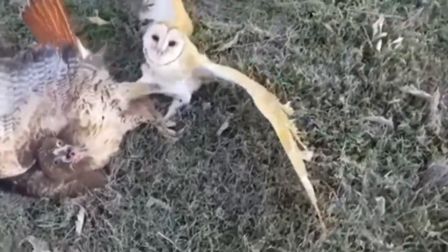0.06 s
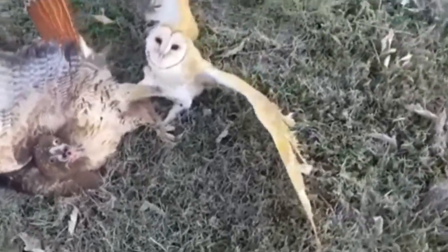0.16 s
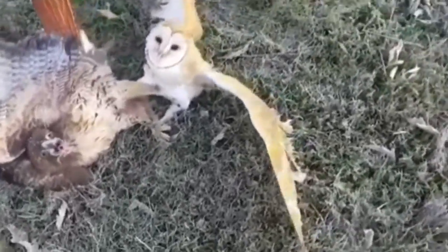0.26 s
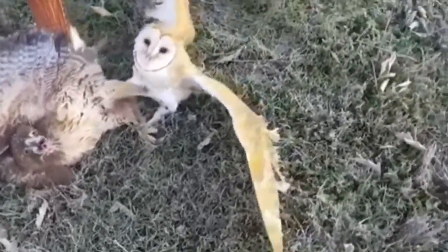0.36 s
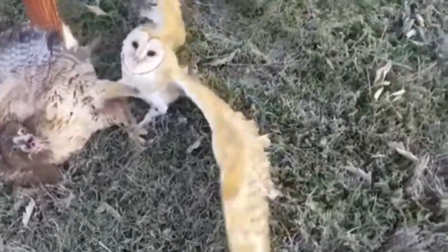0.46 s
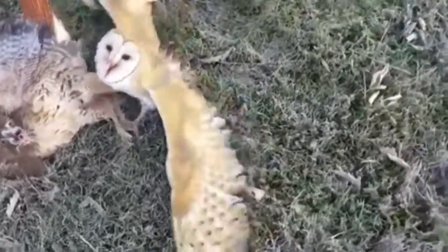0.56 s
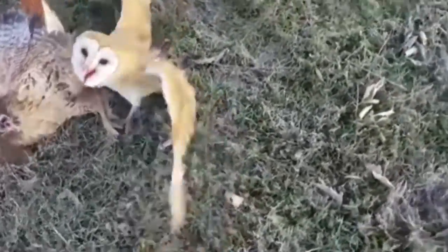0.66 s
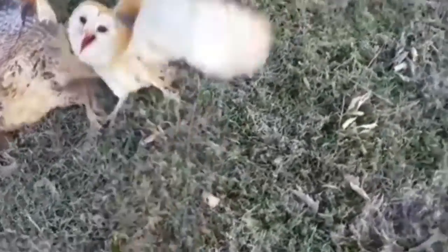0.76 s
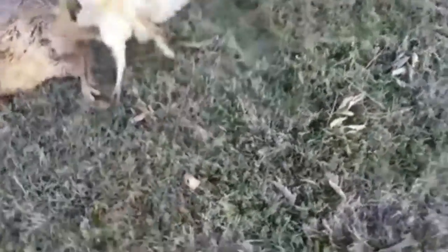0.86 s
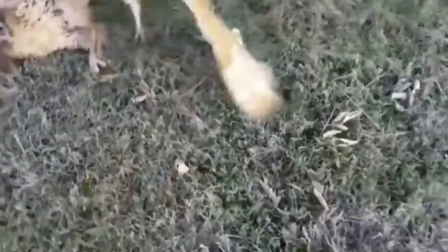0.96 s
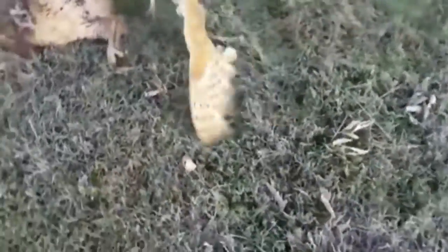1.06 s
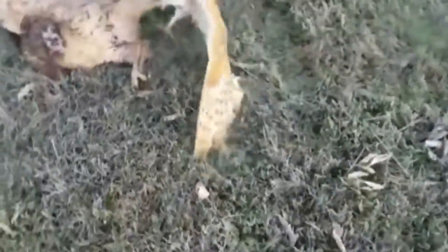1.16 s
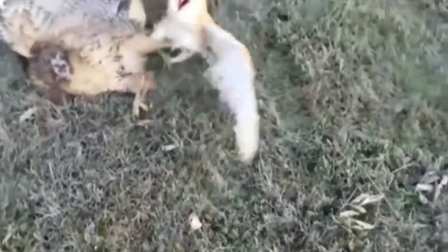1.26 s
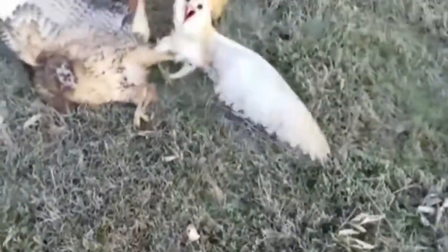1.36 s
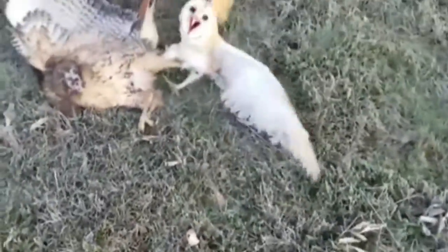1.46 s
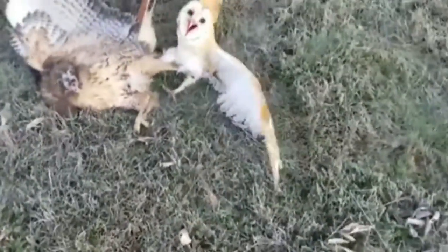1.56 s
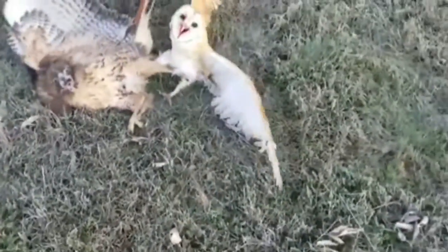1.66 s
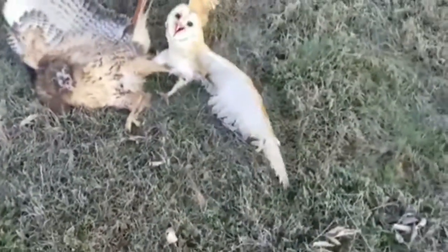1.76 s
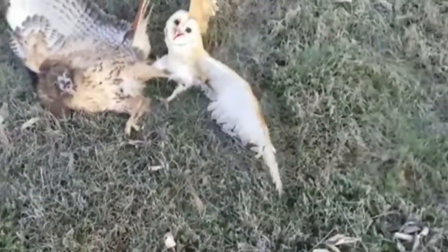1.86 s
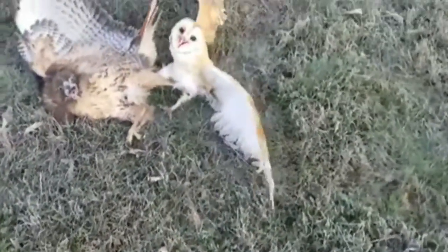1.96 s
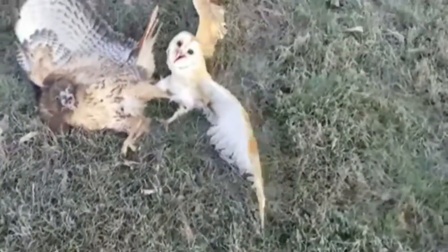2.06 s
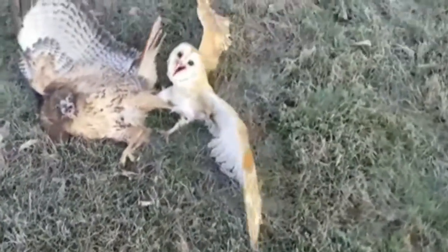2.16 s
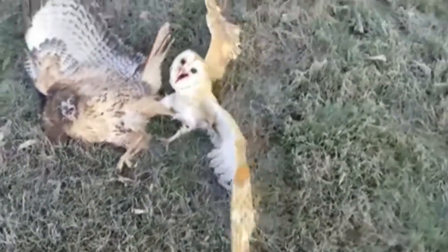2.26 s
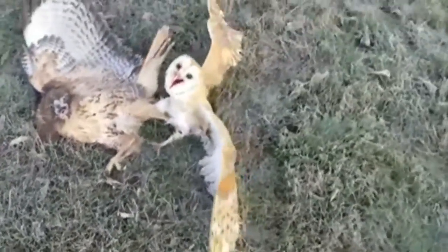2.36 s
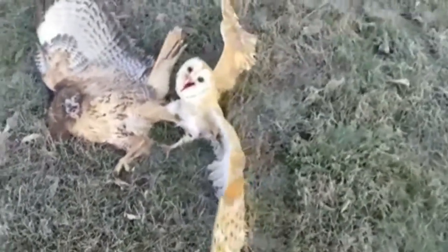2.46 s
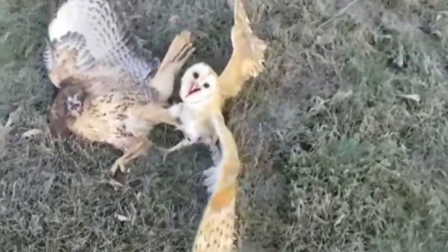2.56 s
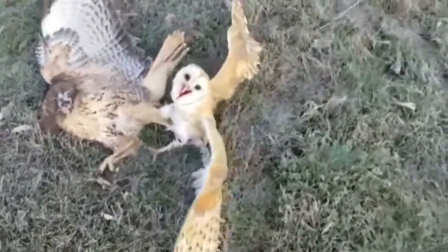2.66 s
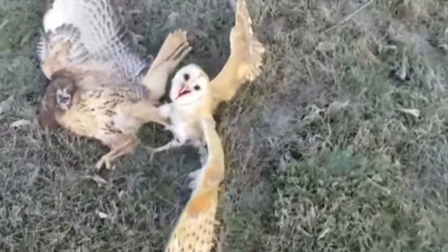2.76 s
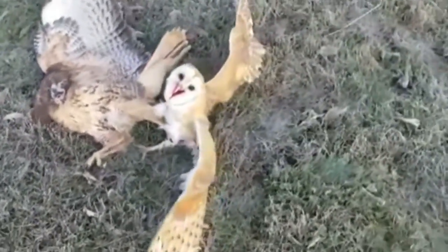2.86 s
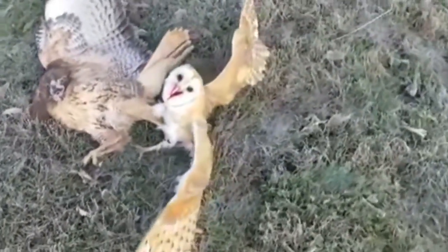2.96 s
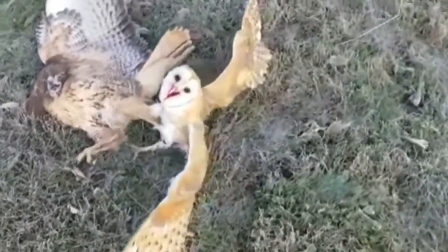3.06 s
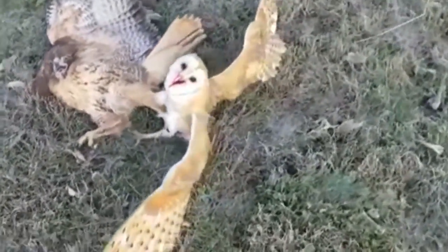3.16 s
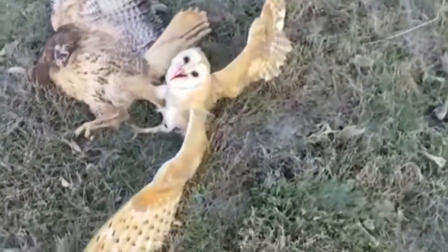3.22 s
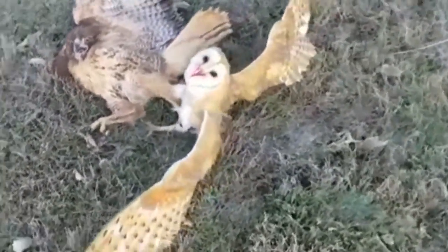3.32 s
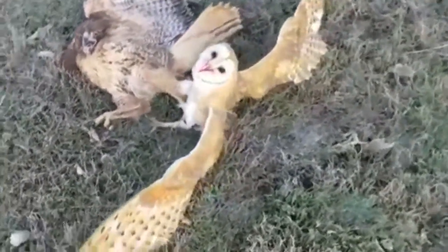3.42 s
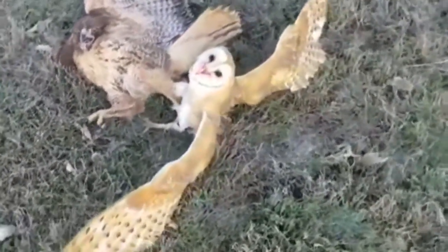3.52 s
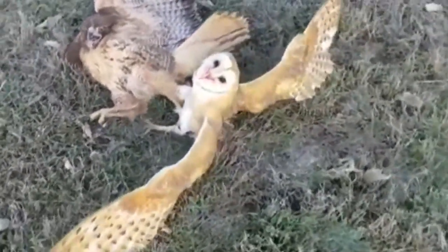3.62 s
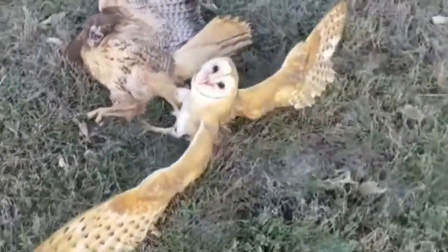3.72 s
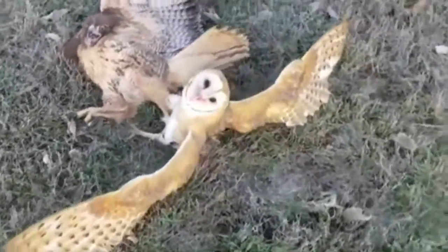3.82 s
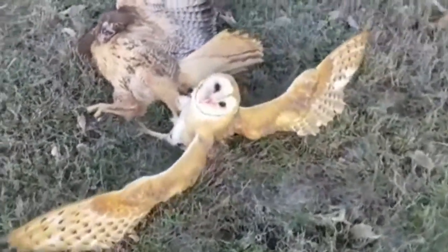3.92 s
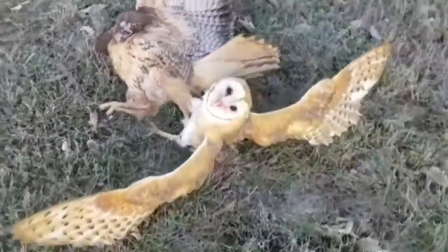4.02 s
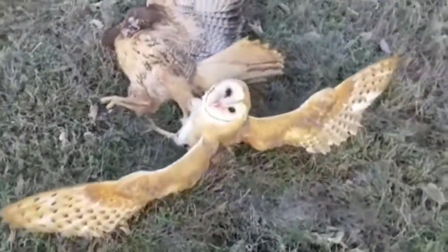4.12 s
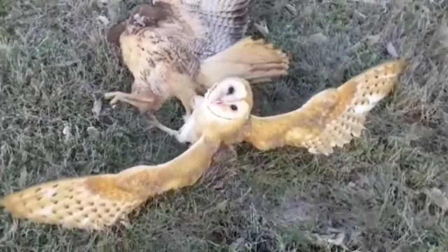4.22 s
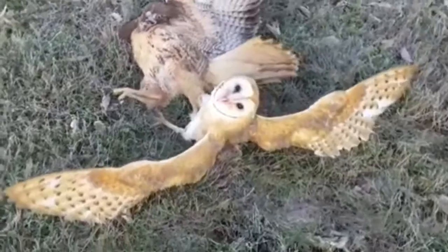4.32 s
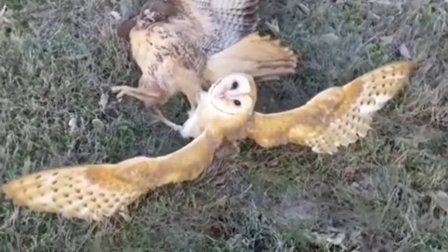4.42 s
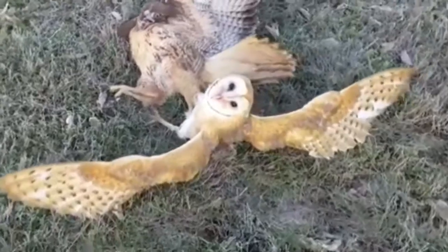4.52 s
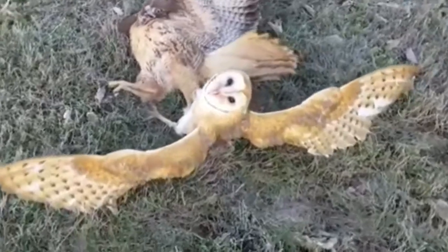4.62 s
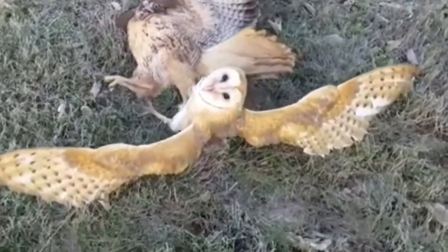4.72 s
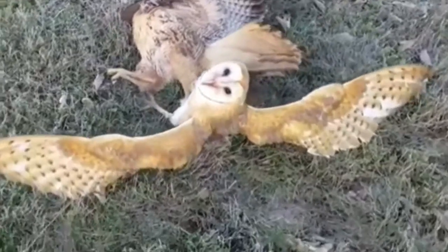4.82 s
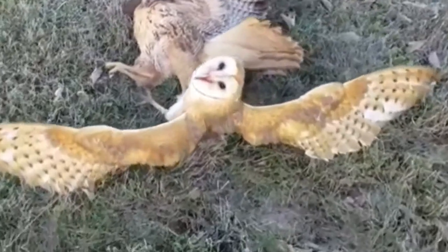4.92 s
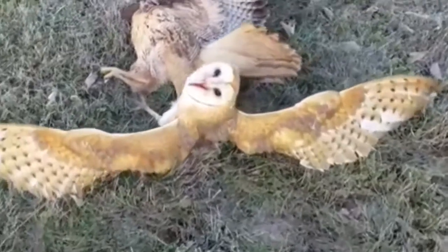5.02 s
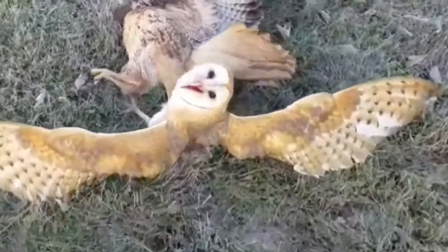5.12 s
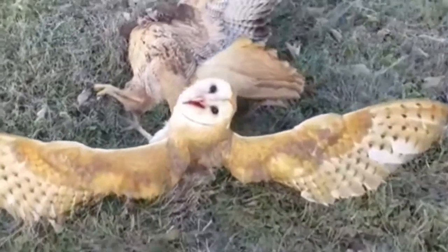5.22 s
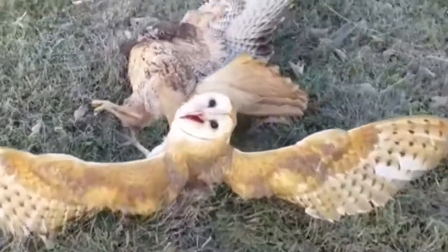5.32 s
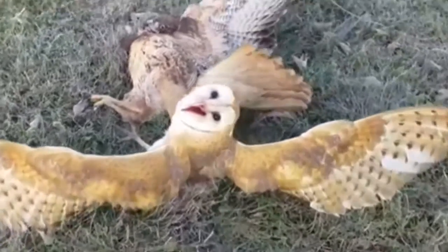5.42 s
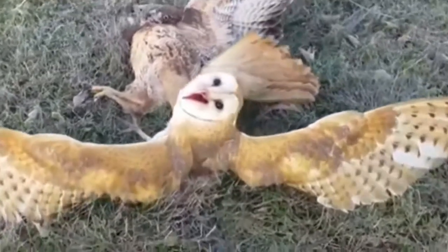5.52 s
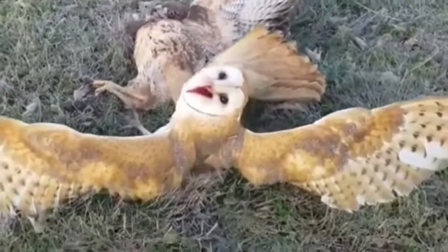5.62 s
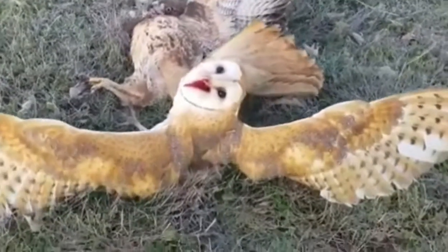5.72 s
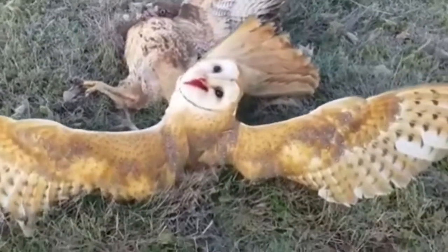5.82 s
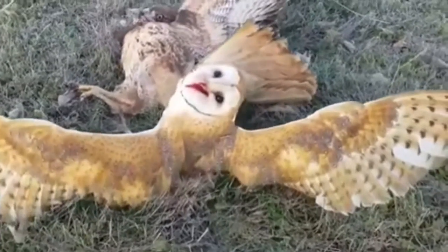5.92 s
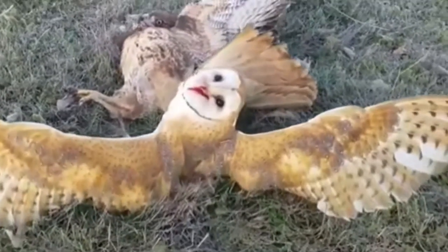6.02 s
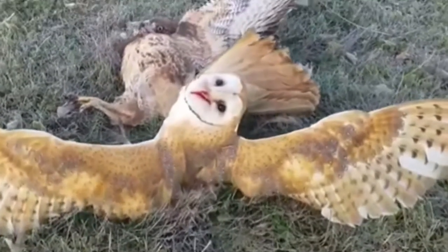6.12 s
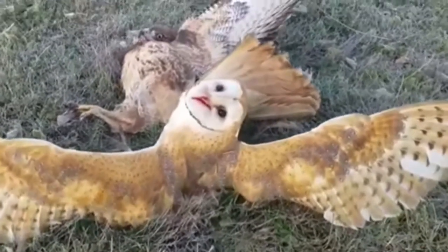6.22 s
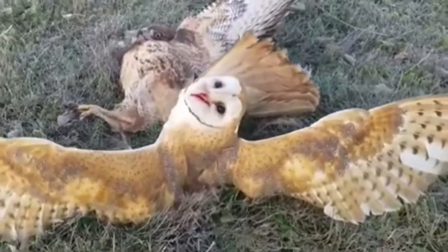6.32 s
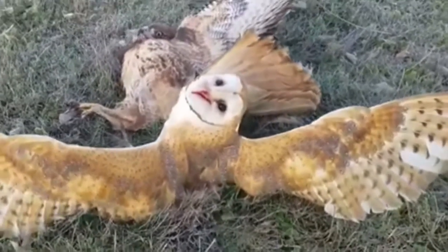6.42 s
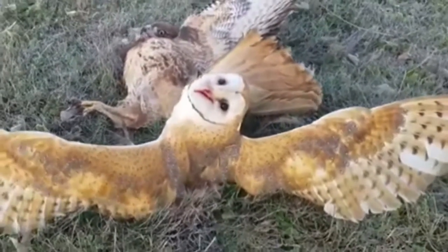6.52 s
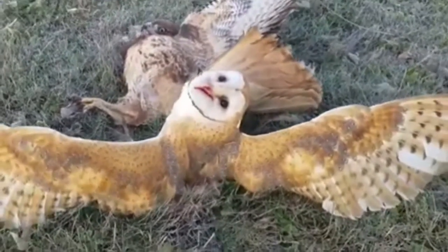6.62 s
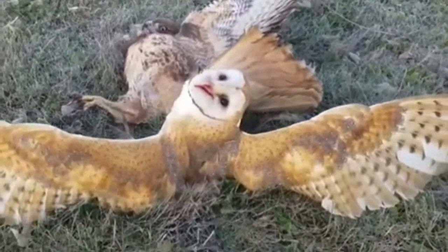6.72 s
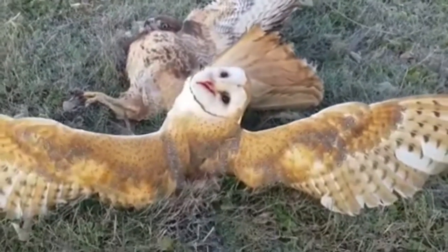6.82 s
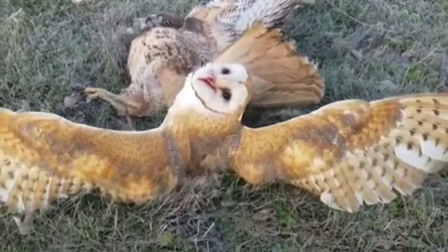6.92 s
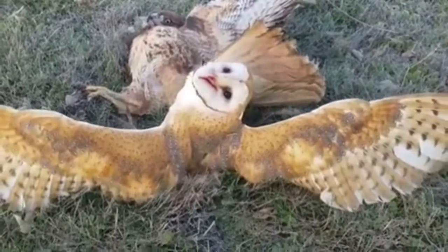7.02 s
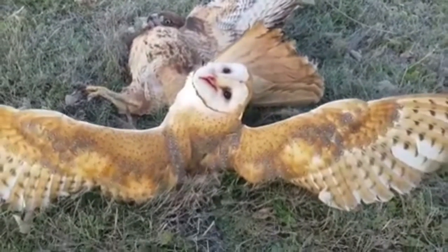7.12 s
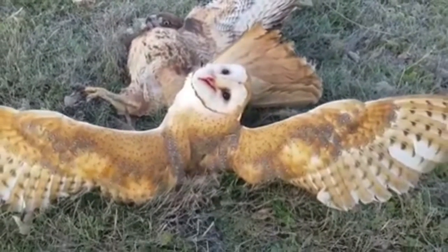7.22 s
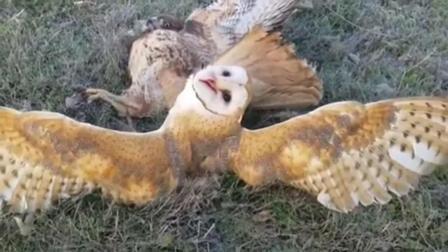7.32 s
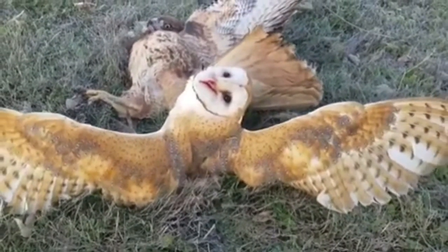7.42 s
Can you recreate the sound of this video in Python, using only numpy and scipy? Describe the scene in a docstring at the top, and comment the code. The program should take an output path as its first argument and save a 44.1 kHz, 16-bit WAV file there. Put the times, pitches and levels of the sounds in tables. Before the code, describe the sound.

Three loud, raspy owl screams outdoors, the first cracking into a piercing squeal, with slight feather rustle, distant engine and soft traffic hiss between.

```python
"""A barn owl screeches three times on a lawn, close to a hand-held phone; the first screech breaks into a squeal.
Overtones of its jittery voice box sing through a strong throat resonance; they roughen when the pitch flicks up.
The squeal is a whistle with a second membrane beating against it, and coloured noise rasps around the voice.
Bursts of noise are feathers rustling in the grass; tyre noise hisses on a road to the right,
and far off an engine, a tone with one overtone, gathers speed."""
import sys
import numpy as np
from scipy import signal
from scipy.fft import rfft, irfft
from scipy.io import wavfile
from scipy.ndimage import uniform_filter1d, minimum_filter1d, map_coordinates

SR = 44100
rng = np.random.default_rng(int(sys.argv[2]) if len(sys.argv) > 2 else 0)


def put_to_file(sound):
    """Save the sound as 16-bit audio at rate SR, in the file named by the first command-line argument."""
    columns = np.atleast_2d(sound).T  # one column per channel
    safe = np.clip(columns, -1, 1)
    whole_steps = np.round(safe * 32767)
    wavfile.write(sys.argv[1], SR, whole_steps.astype(np.int16))


N = 329868
TIME = np.arange(N) / SR  # seconds

# unevenness of the pitch, as a share of it, in a fully rough voice
ROUGH_JITTER = .022
# the air comes in uneven bursts: spread of their level, and how fast they come
RATTLE_DB, RATTLE_HZ = 3.2, 190


def undb(db):
    """Turn decibels into a gain."""
    return 10 ** (np.asarray(db) / 20)


def curves(table):
    """Join the points of each table column by straight lines in time."""
    s, *columns = np.transpose(table)
    return [np.interp(TIME, s, column) for column in columns]


def response(spectrum, hz):
    """Read the gain of a spectrum at the given frequencies."""
    points, db = np.transpose(spectrum)
    return undb(np.interp(np.log(hz + 1), np.log(points), db))


def colour(x, spectrum):
    """Filter a sound by a spectrum, making some pitches louder than others."""
    hz = np.arange(N // 2 + 1) * SR / N
    return irfft(rfft(x) * response(spectrum, hz), N)


def noise(spectrum):
    """Make coloured noise of rms 1."""
    x = colour(rng.standard_normal(N), spectrum)
    return x / x.std()


def wander(hz):
    """Make a random motion up to about hz, with a spread of 1."""
    low_pass = signal.butter(4, hz, fs=SR, output="sos")
    x = signal.sosfilt(low_pass, rng.standard_normal(N))
    return x / x.std()


def delay(x, ms):
    """Make a sound arrive a little later; the delay may move."""
    return map_coordinates(x, [(TIME - ms / 1000) * SR], mode="mirror")


def gate(start, end, edge_s):
    """Open from start to end, with short sloping edges."""
    return np.clip(np.minimum(TIME - start, end - TIME) / edge_s + .5, 0, 1)


def echoes(x, t60):
    """Add up dense random reflections that fall by 60 dB in t60 seconds, different at each microphone."""
    tail = rng.standard_normal((2, SR)) * np.exp(-np.log(1000) * TIME[:SR] / t60)
    tail = tail / np.linalg.norm(tail, axis=1, keepdims=True)
    return signal.fftconvolve(x[None], tail)[:, :N]


def bump(s, half):
    """Make a bell-shaped swell of height 1 around a moment."""
    return np.exp(-.5 * np.minimum(((TIME - s) / half) ** 2, 100))


def swells(table):
    """Add up the gains of bell-shaped swells, each (t/s, level/dB, half length/s)."""
    return sum(undb(db) * bump(s, half) for s, db, half in table)


def flick(s, half):
    """Make a flat-topped jump of height 1 around a moment."""
    return np.exp(-.25 * np.minimum(np.abs((TIME - s) / half) ** 3.2, 200))


def road():
    """Tyre hiss reaches the right microphone before the left; a low rumble comes from all around."""
    # colour of the tyre hiss: f/Hz, level/dB
    tyre_spectrum = [(200, -28.5), (450, -15.5), (750, -5.5), (1250, -3), (1600, -1), (2100, -8),
                     (3000, -14.5), (4500, -28), (9000, -59)]
    # colour of the low rumble: f/Hz, level/dB
    rumble_spectrum = [(15, -19), (40, -7.5), (80, 1), (130, -1.5), (200, -6), (300, -15.5), (450, -21.5),
                       (1000, -29), (3000, -49)]
    # loudness of the road: t/s, tyre hiss level/dB, rumble level/dB
    road_levels = [(0.35, -45.5, -46), (1.6, -57, -52), (3.2, -50.5, -54.5), (4.2, -53.5, -54),
                   (4.65, -50, -47), (5.85, -55.5, -55), (6.9, -57.5, -51), (7.48, -54, -45.5)]
    # how much later the hiss reaches the left microphone as the phone turns: t/s, delay/ms
    road_lag = [(0, 0.45), (4.4, 0.51), (6, 0.46)]
    tyre_db, rumble_db = curves(road_levels)
    hiss = noise(tyre_spectrum) * undb(tyre_db + 0.23 * wander(11))
    late = delay(hiss, curves(road_lag)[0])
    scattered = np.array([noise(tyre_spectrum), noise(tyre_spectrum)]) * undb(tyre_db - 22.5)
    rumble = noise(rumble_spectrum) * undb(rumble_db + 1.5 * wander(8.6))
    # a weak rumble of opposite sign left and right makes the sound wide
    spread = np.array([[1], [-1]]) * noise(rumble_spectrum) * undb(rumble_db - 18.5)
    return np.array([late, hiss]) + scattered + rumble + spread


def engine():
    """A far engine fires steadily faster, with one smooth pull to a higher speed."""
    start_hz, creep_hz_per_s = 83.3, 1.7
    pull_hz, pull_at_s, pull_s = 59, 3.87, 0.28
    base_db = -55.5
    # swells added to the base level: t/s, level/dB, half length/s
    surges = [(1.6, -52.5, 0.21), (3.17, -46, 0.18), (4.0, -61.5, 0.063)]
    pull = pull_hz / (1 + np.exp((pull_at_s - TIME) / pull_s))
    hz = start_hz + creep_hz_per_s * TIME + pull
    phase = 2 * np.pi * np.cumsum(hz * (1 + 0.001 * wander(6.6))) / SR
    tone = np.sin(phase) + undb(-16.0) * np.sin(2 * phase)
    return tone * (undb(base_db) + swells(surges)) * undb(2 * wander(8.2))


def grass():
    """Blades of grass crackle as noise under each brush of feathers and feet."""
    # colour of the crackle: f/Hz, level/dB
    grass_spectrum = [(300, -5), (1500, 4.5), (3000, -1), (4500, -1.5), (6500, 0), (8200, -7), (9600, -19)]
    # quick flicks and long scuffles: t/s, level before the gain of each side/dB, half length/s
    brushes = [(0.02, -56, 0.39), (0.166, -54, 0.0043), (1.5, -57, 0.11), (1.778, -61, 0.091),
               (1.83, -58, 0.0022), (3.17, -60.5, 0.095), (3.34, -58, 0.016), (3.82, -59, 0.23),
               (4.3, -59.5, 0.051), (4.55, -57.5, 0.16), (5.8, -67, 0.15), (6.405, -64.5, 0.063),
               (6.55, -62.5, 0.019)]
    pressure = swells(brushes) * undb(0.35 * wander(7.1) + 0.62 * wander(300))
    shared = noise(grass_spectrum)
    left = undb(-9.5) * (shared + noise(grass_spectrum))
    right = undb(4.0) * shared
    return pressure * np.array([left, right])


def gesture(start, end, hz, db, swell_s, hoarse_s, rough, gape_db, wide, scoop, settle_s, drop, choke_db):
    """A voice box starts slack, hoarse and weak, tightens, holds while the owl tires, and lets go."""
    # while the sound is held, the owl tires and its beak opens wider
    tiring_db_per_s, gape_db_per_s, fray_per_s = -6.5, 7, 0.063
    # towards the end the air runs out and the beak is thrown wide
    spent_db, gasp_db, spent_s = -2.5, 5.5, 0.11
    # the voice box lets go: the pitch drops and roughens, then the sound stops
    drop_s, drop_rough, release_db, release_s = 0.02, 0.4, -33.5, 0.005
    onset_db = -38
    age = np.clip(TIME - start, 0, end - start)
    left = np.clip(end - TIME, 0, end - start)
    letting_go = np.exp(-(left / drop_s) ** 2)
    # the wider the beak, the less the voice runs out of air
    spent = (1 - wide) * np.exp(-left / spent_s)
    pitch = hz * (1 - scoop * np.exp(-age / settle_s) - drop * letting_go)
    effort_db = db + onset_db * np.exp(-age / swell_s) + tiring_db_per_s * age
    effort_db = effort_db + spent_db * spent + release_db * np.exp(-left / release_s)
    gain = undb(effort_db) * gate(start, end, edge_s=.006)
    hoarse = np.maximum(np.exp(-(age / hoarse_s) ** 2), drop_rough * letting_go)
    roughness = rough + (1 - rough) * hoarse + fray_per_s * age
    treble_db = gape_db + gape_db_per_s * age + gasp_db * spent
    return np.array([pitch, gain, roughness, treble_db, np.full(N, np.clip(wide, 0, 1)), np.full(N, choke_db)])


def harmonics(hz, rough, wide, strain, choke_db, flutter):
    """Throat resonances weight each overtone of the voice box; strain alters the main one and dims the odd ones."""
    # throat and open beak: f/Hz, level/dB
    throat_spectrum = [(700, -45), (1150, -21), (1500, -24), (1780, -17), (2150, -27.5), (2500, -7.5),
                       (2950, 0), (3060, 0.5), (3220, -2.5), (3700, -14), (4300, -39), (5400, -29),
                       (7600, -34), (9500, -62.5)]
    # throat with the beak thrown wide, flatter and brighter: f/Hz, level/dB
    wide_spectrum = [(700, -31), (1200, -16.5), (1650, -2.5), (1900, 3.5), (2150, -14), (2550, 8.5),
                     (3300, 2.5), (3850, -0.5), (4400, -12.5), (5100, -13), (5800, -17.5), (7600, -21),
                     (9500, -28)]
    # strength of each overtone at the voice box, from the fundamental up: level/dB
    overtone_levels = [-12.5, -1, -16, 0.5, -15.5, -4, -7.5, -4, -8, -4, -12.5, -3]
    odd_fade_db = -4  # at full strain with the beak not wide
    # phase slips in radians, before roughness scales them; the fundamental smears into a breathy band
    fundamental_slip, strong_slip, slip_per_overtone = 2.5, .22, .16
    torn_slip = .65  # extra slip of the main overtone, before roughness and beak scale it
    phase, voice = 2 * np.pi * np.cumsum(hz) / SR, 0
    smooth_hz = uniform_filter1d(hz, size=180)
    for k, db in enumerate(overtone_levels, start=1):
        narrow_gain = response(throat_spectrum, k * smooth_hz)
        wide_gain = response(wide_spectrum, k * smooth_hz)
        throat = narrow_gain ** (1 - wide) * wide_gain ** wide
        db = db + k % 2 * odd_fade_db * strain * (1 - wide)
        # the second and fourth hold steadiest; the others slip in phase and widen into bands
        if k == 1:
            radians = fundamental_slip
        elif k in (2, 4):
            radians = strong_slip
        else:
            radians = slip_per_overtone * max(k, 5)
        slip = radians * (.7 + rough / 2) * wander(120)
        if k == 4:  # roughness tears the main overtone into sidebands
            slip = slip + torn_slip * (1 + wide) * rough ** 2 * wander(300)
            db = db + choke_db * strain
        elif k != 2:  # the weaker overtones come and go
            db = db + 3 * wander(60) + 4 * wander(14)
        tone = throat * undb(db) * np.sin(k * phase + slip)
        voice = voice + tone * (1 + flutter * rough * wander(190))
    return voice * np.sqrt(2)


def screeches():
    """Uneven cycles make the voice harsh, over rasping air; it growls when slack and rattles more when strained."""
    # stretches of screeching; the first two stand before and after the squeal: start/s, end/s, held pitch/Hz,
    # starting effort/dB, swell time/s, hoarse start/s, held roughness/0-1, starting treble from the open beak/dB,
    # beak thrown wide/0-1, share by which the pitch starts low, time to settle/s,
    # share by which it drops at the end, change of the main overtone at full strain/dB
    screech_rows = [(0.516, 0.621, 842.5, -13, 0.017, 0.036, 0.4, -5, 0.85, 0.34, .012, 0.018, 0.5),
                    (1.274, 1.465, 854, -18.5, 0.0036, 0.013, 0.58, 0.5, 0.6, .03, 0.013, .4, 0.5),
                    (2.039, 3.134, 750, -4, 0.099, 0.17, 0.12, -1, 0.18, .28, .04, 0.22, -2),
                    (4.708, 5.76, 740.5, 0, 0.093, 0.083, 0.24, -4, 0.03, 0.17, .11, 0.1, 0)]
    # quick or drawn-out flicks of the pitch, sags if negative: t/s, rise/Hz, half length/s
    flicks = [(0.604, 115, .011), (2.248, 35, .035), (2.297, 59.5, .005), (2.34, 22, .013),
              (2.384, -15.5, .016), (2.427, -28, .009), (2.453, 60, .006), (2.494, 100, .011),
              (2.495, 46, .004), (2.521, 104.5, .0046), (2.549, 104, .0066), (2.55, 28.5, .058),
              (2.584, 109.5, .004), (2.607, 109.5, .006), (2.64, 90.5, .0032), (2.682, 15.5, .02),
              (2.706, 65.5, .004), (2.779, 8, .03), (2.848, 79, .0062), (2.862, -21, .005),
              (2.881, 42.5, .004), (2.91, -11, .02), (2.976, 76, .0055), (3.002, 79, .0055),
              (3.051, 79.5, .018), (3.09, 51.5, .011), (4.765, 18.5, .012), (4.818, -51, .012),
              (4.847, 54, .004), (4.863, 46, .006), (4.897, -33, .008), (4.928, 50, .009),
              (4.986, 45.5, .007), (5.015, 75, .008), (5.041, 76.5, .007), (5.079, 51, .006),
              (5.107, 27.5, .006), (5.152, 81.5, .0036), (5.199, 86.5, .0066), (5.25, 45, .004),
              (5.273, 63.5, .0042), (5.336, 51.5, .005), (5.419, -11.5, .02), (5.473, 49.5, .008),
              (5.517, 33.5, .004), (5.548, 36, .006), (5.652, 70, .026), (5.665, 46.5, .013),
              (5.725, -24, .022)]
    # moments when the voice cracks: t/s, added roughness/0-1, half length/s
    cracks = [(2.28, .25, .018), (2.475, .3, .008), (3.065, .2, .03), (4.785, .2, .012), (4.85, .35, .013),
              (4.926, .45, .005), (5.048, .2, .008), (5.078, .25, .006), (5.472, .25, .008)]
    # air rasping through the beak: f/Hz, level/dB
    rasp_spectrum = [(400, -51), (1000, -19.5), (1600, -16), (2000, -4), (2600, -8.5), (3200, -11.5),
                     (3800, -5.5), (4400, -19.5), (5200, -10.5), (7800, -15), (8600, -32), (9500, -17),
                     (10500, -50)]
    # low growl of a slack voice box: f/Hz, level/dB
    growl_spectrum = [(400, -35.5), (750, -11), (1100, -1), (1500, 4.5), (2600, 2), (3200, -9),
                      (4200, -22.5)]
    # throat resonance rung by the bursts of air: f/Hz, level/dB
    ring_spectrum = [(1900, -40), (2450, -11.5), (2800, 1.5), (3050, 0.5), (3300, -9), (3800, -34.5)]
    # air levels before roughness and effort; a wide beak lets more rasp through
    rasp_db, wide_rasp_db, growl_db, ring_db = -18, 13.5, 0.5, -7
    # the growl sets in below this pitch and is full one span lower
    slack_hz, slack_span_hz = 735, 110
    # around and above this pitch the voice is strained
    strain_hz, strain_span_hz, strain_rough = 803, 18, .14
    waver_hz, quaver = 7, .008  # random motion of the pitch: Hz before the wide beak adds to it, and a share
    controls = gesture(*screech_rows[0])
    for row in screech_rows[1:]:
        controls = np.where(TIME > row[0] - .1, gesture(*row), controls)
    hz, gain, rough, gape_db, wide, choke_db = controls
    slack = np.clip((slack_hz - hz) / slack_span_hz, 0, 1)
    hz = hz + sum(rise * flick(s, half) for s, rise, half in flicks)
    hz = hz + waver_hz * (1 + wide) * wander(55)
    strain = .5 + .5 * np.tanh((hz - strain_hz) / strain_span_hz)
    crack = sum(share * bump(s, half) for s, share, half in cracks)
    rough = np.clip(rough + strain_rough * strain * (1 - wide) + crack, 0, 1)
    jitter = quaver * wander(90) + ROUGH_JITTER * rough * wander(400)
    voice = harmonics(hz * (1 + jitter), rough, wide, strain, choke_db, flutter=0.44)
    rasp = undb(rasp_db + wide_rasp_db * wide) * noise(rasp_spectrum)
    growl = undb(growl_db) * slack * noise(growl_spectrum)
    ring = undb(ring_db) * (1 - slack) * noise(ring_spectrum)
    rattle = undb(RATTLE_DB * (1 + strain) / 2 * wander(RATTLE_HZ))
    voice = voice + (rasp + growl + ring) * rough ** 2 * rattle
    high_pass = signal.butter(4, 4300, "high", fs=SR, output="sos")
    treble = signal.sosfiltfilt(high_pass, voice)
    return (voice - treble + undb(gape_db) * treble) * gain


def squeal():
    """The voice flips to a whistle; its period doubles at times, and a second membrane beats against it."""
    # the squeal in the middle of the first screech: t/s, pitch f/Hz, level before the overall gain/dB
    squeal_path = [(0.614, 2657, -3), (0.647, 2515, -16.5), (0.669, 2637, -15), (0.682, 3597, -16.5),
                   (0.725, 3720, -9), (0.787, 3500, -16), (0.835, 3658, -13), (0.866, 3740, -18.5),
                   (0.888, 3500, -21), (0.912, 2702, -19.5), (1.085, 2655, -18), (1.15, 2420, -24),
                   (1.19, 2405, -23.5), (1.222, 2380, -20), (1.26, 2375, -25), (1.287, 2335, -26)]
    # the second membrane joins in: t/s, level against the whistle/dB, half length/s, its pitch f/Hz
    beats = [(0.674, -6.5, 0.011, 2900), (0.758, -11.5, 0.022, 3250), (0.9, -3.5, 0.005, 3200),
             (0.955, -2.5, .016, 3130), (1.025, -2, .026, 2980), (1.085, 2.5, .014, 3080),
             (1.117, -6, .009, 2750)]
    # the period of the whistle doubles: t/s, level against the whistle/dB, half length/s
    doublings = [(0.712, -23, 0.013), (0.862, -11.5, 0.014)]
    # air rasping around the squeal: f/Hz, level/dB
    squeal_air = [(500, -27.5), (1500, -14.5), (1900, -5.5), (2200, -9), (2750, -4), (3050, -12.5),
                  (3550, 0.5), (3850, -10), (4100, -5.5), (4400, -22.5), (5300, -14.5), (6150, -7),
                  (6600, -18.5), (7600, -17), (9500, -27.5)]
    overall_db, rasp_db = 3.5, -3  # the rasp is further scaled by roughness
    leap_hz_per_s = 9900  # a glide this fast counts as a leap
    # roughness 0-1: held, added in a leap, added while the membranes beat, added at low pitch
    held_rough, leap_rough, beat_rough, sag_rough = 0.08, 0.16, 0.1, .16
    hz, level_db = curves(squeal_path)
    beat = swells(row[:3] for row in beats)
    leap = np.tanh(np.abs(np.gradient(hz)) * SR / leap_hz_per_s)
    sag = np.interp(hz, [2330, 2370, 2700], [1, .4, 0])
    rough = np.clip(held_rough + leap_rough * leap + beat_rough * beat + sag_rough * sag, 0, 1)
    jitter = .004 * wander(70) + ROUGH_JITTER * rough * wander(400)
    phase = 2 * np.pi * np.cumsum(hz * (1 + jitter)) / SR
    second_hz = curves(beats)[-1]
    second = 2 * np.pi * np.cumsum(second_hz * (1 + .024 * wander(200))) / SR
    # the overtone stands out most at low pitch
    overtone_db = np.interp(hz, [2400, 2700, 3600], [-13, -24, -22])
    slip = (.45 + 1.2 * rough) * wander(110)
    overtone = undb(overtone_db + 3.5 * wander(40)) * np.sin(2 * phase + slip)
    whistle = np.sin(phase) + overtone
    half = (phase + slip) / 2  # half the pitch is twice the period
    doubled = swells(doublings) * (np.sin(half) + undb(-6.0) * np.sin(phase + half))
    beating = beat * (np.sin(second) + undb(-27.0) * np.sin(second + phase))
    # hold the power of whistle and second membrane together about even
    tone = np.sqrt(2 / (1 + beat ** 2)) * (whistle + doubled + beating)
    tone = tone * (1 + .4 * rough * wander(170) + .08 * wander(35))
    rasp = undb(rasp_db + RATTLE_DB * wander(RATTLE_HZ)) * rough ** 1.4 * noise(squeal_air)
    opening = gate(squeal_path[0][0], squeal_path[-1][0], edge_s=.005)
    return (tone + rasp) * undb(level_db + overall_db) * opening


def owl():
    """Close bounces stripe the treble of the voice at two microphones and shift as the owl moves; echoes answer."""
    # share of the voice scattered by wings, ground and hands: f/Hz, level/dB
    scatter_spectrum = [(1500, -30), (3000, -18), (3600, -5), (4200, 0), (9000, 0)]
    # bounces off the ground and spread wings as the owl moves: t/s, ground delay/ms, wing delay/ms
    bounces = [(0.85, .55, 1.09), (1.0, .55, .79), (1.46, .55, .79), (2.1, .54, .62), (2.62, .55, .6),
               (2.74, .5, .77), (5.05, .52, .77), (5.4, .53, .73)]
    # what the left microphone hears less or more than the right: f/Hz, level/dB
    left_spectrum = [(1700, -1), (2400, -0.5), (3000, -4), (3650, -11), (4300, -3), (9000, 1)]
    # the owl turns towards one side or the other: t/s, left minus right level/dB
    lean = [(0.6, -1), (0.86, 0), (0.98, 2), (1.22, 8), (1.36, 2.5), (2.3, 1), (2.7, 1.74), (5.1, 0.1),
            (5.7, 1)]
    # far walls answer: delay/ms, level/dB
    far_echoes = [(105, -53), (215, -55)]
    ground_db, wing_db, hand_db, hand_ms = -5, -7, -8, 1.34
    scattered_db, scattered_t60_s = -5, .03
    garden_db, garden_t60_s = -50, .8
    voice = screeches() + squeal()
    stray = colour(voice, scatter_spectrum)
    ground_ms, wing_ms = curves(bounces)
    near = voice + undb(ground_db) * delay(stray, ground_ms)
    near = near + undb(wing_db) * delay(stray, wing_ms)
    near = near + undb(hand_db) * delay(stray, hand_ms)
    # one scattered part is the same on both sides, the other has opposite sign
    shared, apart = undb(scattered_db) * echoes(colour(near, scatter_spectrum), t60=scattered_t60_s)
    left = colour(near + shared + apart / 2, left_spectrum)
    right = delay(near + shared - apart / 2, ms=0.042)
    lean_db = curves(lean)[0]
    direct = np.array([left, right]) * undb(np.array([lean_db, -lean_db]) / 2)
    far = sum(undb(db) * echoes(delay(voice, ms), t60=.06) for ms, db in far_echoes)
    garden = undb(garden_db) * echoes(voice, t60=garden_t60_s)
    return direct + far + garden


def scene():
    """Sum the road, the engine, the brushed grass and the owl."""
    return road() + engine() + grass() + owl()


def record(dry):
    """The phone holds the loudest peaks down and cuts the top of the treble."""
    top_hz = 9750
    peak = -minimum_filter1d(-np.abs(dry).max(axis=0), size=400)
    gain = uniform_filter1d(np.minimum(1, .88 / (peak + 1e-9)), size=400)
    low_pass = signal.ellip(10, .2, 75, top_hz, fs=SR, output="sos")
    return signal.sosfilt(low_pass, dry * gain)


dry = scene()
out = record(dry)
put_to_file(out)
```